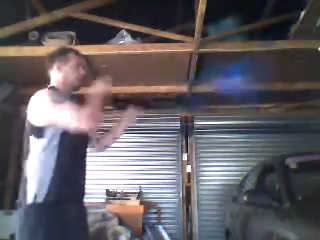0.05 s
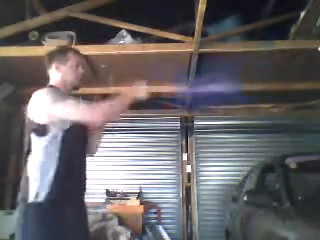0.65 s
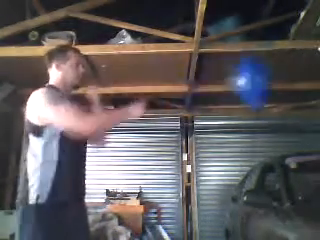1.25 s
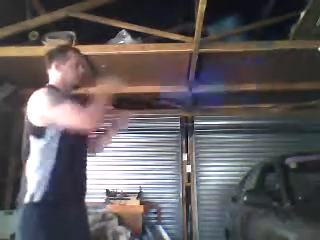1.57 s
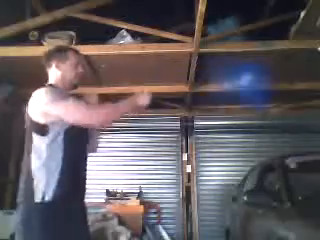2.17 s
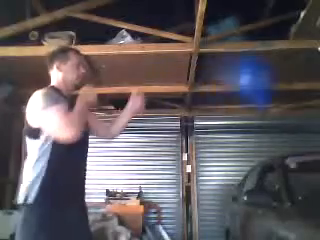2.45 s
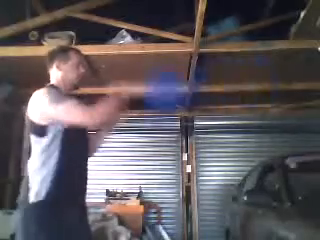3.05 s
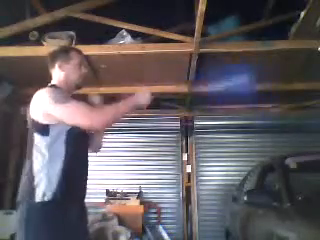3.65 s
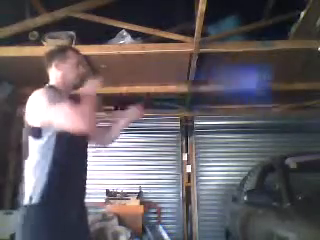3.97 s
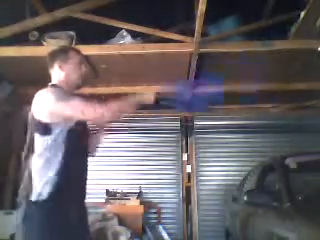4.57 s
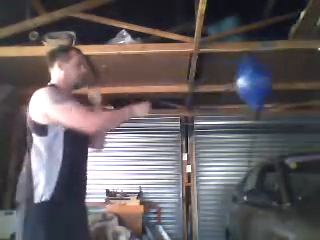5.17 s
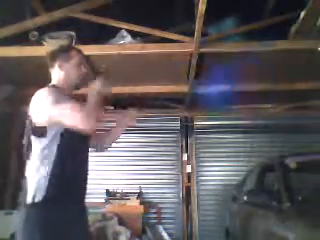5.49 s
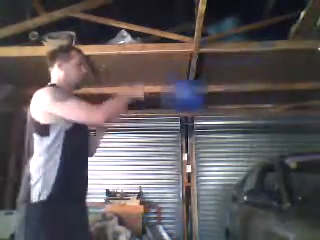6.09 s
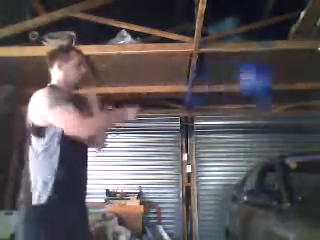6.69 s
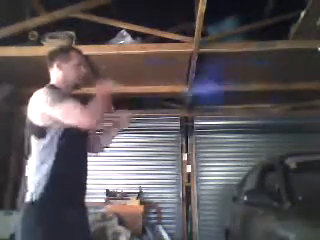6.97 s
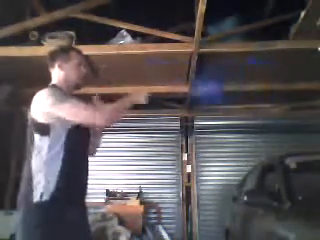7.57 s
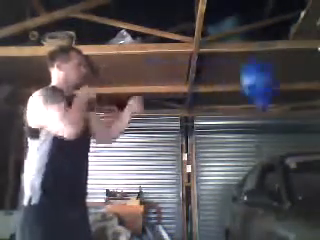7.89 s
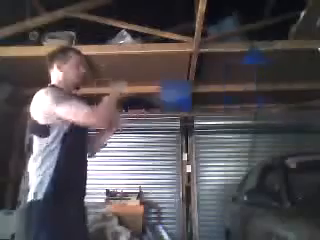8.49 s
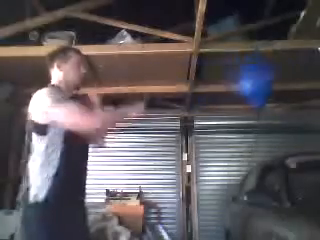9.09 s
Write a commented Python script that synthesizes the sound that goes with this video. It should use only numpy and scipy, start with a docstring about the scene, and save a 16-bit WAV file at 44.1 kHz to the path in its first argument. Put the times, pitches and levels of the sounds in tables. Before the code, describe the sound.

In a garage, a fast, regular run of punches lands on a ball strung on elastic cords. Every blow gives a crisp smack and a hollow thud, varying slightly in strength and tone, and the walls throw it back briefly. Light cord ticks and, later, a few small steel hook clinks fall between the hits. The pace never breaks, and a low, even background noise lies underneath, heard through a small microphone.

```python
"""Punching a focus ball in a garage

Fists strike a ball on tight elastic cords four times a second. Each impact is a slap of skin on the
cover and a hollow thump from the ball's damped modes. Walls, rafters and steel door return it as
early reflections, standing waves and reverberation. Between punches the cords tick and their metal
hooks clink, over a low, steady noise."""
import sys
import numpy as np
from scipy import signal
from scipy.fft import rfft, irfft
from scipy.io import wavfile
from scipy.ndimage import uniform_filter1d

SR = 44100
rng = np.random.default_rng(int(sys.argv[2]) if len(sys.argv) > 2 else 0)


def put_to_file(sound):
    """Save the sound as 16-bit audio at rate SR, in the file named by the first command-line argument."""
    columns = np.atleast_2d(sound).T  # one column per channel
    safe = np.clip(columns, -1, 1)
    whole_steps = np.round(safe * 32767)
    wavfile.write(sys.argv[1], SR, whole_steps.astype(np.int16))


N = 411894
SIZE = 32768  # samples in which one event is built
AGE, HZ = np.arange(SIZE) / SR, np.fft.rfftfreq(SIZE, 1 / SR)

# Background noise: f/Hz, relative spectral density/dB
NOISE_SPECTRUM = [(25, 10), (60, 12.5), (100, -33), (165, 1.5), (230, -6.5), (400, 4.5), (900, -3.5),
                  (2000, -6.5), (4000, -14), (7000, -17.5), (10500, -16), (12200, -27), (13700, -60)]
# Reflections from the nearest surfaces: delay/ms, signed gain
REFLECTIONS = [(3.26, 1.05), (9.3, .42), (10.19, -.28), (11.2, .47), (16.74, .27), (22.13, .3),
               (22.89, -.15), (27.51, .2), (36.3, .3), (41.16, -.22), (47.23, .16), (56.43, .17)]
# Standing waves of the garage: f/Hz, level/dB, T60/s
ROOM_MODES = [(153.9, -33, 0.34), (235.4, -35.5, 0.6)]
# Colour of the reverberation: f/Hz, level/dB
REVERB_SPECTRUM = [(100, -4.5), (160, 10), (220, -4.5), (350, 4), (550, 11.5), (1200, 4), (2700, 7.5),
                   (5000, 5), (10000, -1)]
# Reverberation time: f/Hz, T60/s
REVERB_TIME = [(150, 0.47), (500, 0.34), (2000, 0.34), (5000, 0.39), (11000, 0.3)]
# Clearest ticks of the cords and brushes on the cover: t/s, relative level/dB
CORD_TICKS = [(0.505, -31), (1.24, -36), (1.448, -31), (1.544, -30), (2.911, -26), (3.201, -29),
              (3.292, -23), (3.524, -32.5), (4.013, -21), (4.389, -22.5), (4.577, -14.5), (5.307, -19),
              (6.097, -36), (6.212, -25.5), (6.454, -35), (6.786, -22), (7.037, -27), (7.441, -22.5),
              (7.909, -32), (7.937, -25), (8.016, -22), (8.505, -15)]
# Colour of a tick: f/Hz, level/dB
TICK_SPECTRUM = [(100, -34), (500, -10.5), (1500, 0.5), (3000, -5.5), (6000, -8.5), (9500, 2.5),
                 (11800, -9), (13700, -53)]
# Clinks of the hooks: t/s, relative level/dB
HOOK_CLINKS = [(4.0756, -17.5), (4.5605, -20), (4.8643, -23), (5.3457, -21), (5.5404, -20.5), (6.056, -24),
               (8.7545, -16.5)]
# Modes of a steel hook: f/Hz, relative level/dB, T60/s
HOOK_MODES = [(3140, -20, .02), (3580, 0, 0.034), (4570, -1, 0.017), (5020, 6, 0.025), (6000, -3, 0.014),
              (7700, 5, 0.011), (10300, 0, .006)]
# Hollow thump of the ball: f/Hz, signed initial amplitude, T60/s
BALL_MODES = [(216.4, -.152, .128), (330, .24, .0165)]
# Brief ringing of air and cover: f/Hz, level/dB, T60/s
COVER_MODES = [(615, -46, 0.075), (760, -44, 0.084), (960, -40, 0.053), (1089, -33, 0.053),
               (1407, -29, 0.037), (1994, -35, 0.027)]
# Slap of skin on the cover: f/Hz, level/dB
SLAP_SPECTRUM = [(60, -13.5), (200, 3), (450, 10), (850, 15), (1200, 10), (1450, 15.5), (1950, 11.5),
                 (2600, 5.5), (3400, 6), (6000, 5.5), (9200, 10), (10800, 6.5), (12200, -9.5), (13700, -41)]
# Punches, with levels relative to a usual one:
# t/s, thump/dB, slap/dB, knuckle snap/dB, squareness of contact/dB, air pop f/Hz, air pop/dB
BLOWS = [(0.0845, 1, 0.0, 3.0, 8.0, 1970, 4.5), (0.333, -5.0, -4.5, 2.0, -8.5, 3040, 6.0),
         (0.5765, 0.0, 2.0, -1.5, 6.5, 1020, 1.5), (0.8263, -5, -2.5, -4.5, -3, 4090, 3),
         (1.075, -2, 1.5, -1, 5.0, 1560, 0.5), (1.32, 2.5, -0.5, 0, 4.5, 1950, 7.5),
         (1.567, 2.5, 3.5, -2.5, 3, 2720, 5.5), (1.819, -1.5, -3.5, 0.5, -0.5, 4090, 6.5),
         (2.0655, 3.5, 3.5, -2.0, -5, 2250, 5), (2.3092, -0.5, -3, 2.5, -8, 770, 5.5),
         (2.5542, 1.5, 1.0, 2.5, 3, 2270, 7), (2.807, 3.0, 0.0, -3.5, -1, 1990, 6.0),
         (3.057, -0.5, 0, 0.5, 8.5, 1210, 8), (3.2992, -4, -4, 5.5, -0.5, 1240, 7.5),
         (3.5414, -2.5, -1, 4.5, 14, 1800, 5), (3.7805, -0.5, -3.0, 1, -3, 965, 5),
         (4.0223, -4, 1.0, -0.5, 2.0, 850, 0), (4.2653, 1, -2, 3, 7, 1620, 3.5),
         (4.5157, -1.5, 3, -8.0, -6, 2800, 4), (4.7649, -1.5, -2.5, 4.0, 7.5, 1520, 3.5),
         (5.0085, 3, 2, 5, 2.0, 600, 1.5), (5.2481, -0.5, 0, -4.0, -6, 4200, 3.5),
         (5.4908, 2, -1, -2.5, 2, 3670, 6), (5.7437, 2, -1, 3, 8, 880, 5.5),
         (5.9853, -4.0, -2, 7.5, 2.5, 1500, 1), (6.2291, 1.5, 0.5, -5.5, -3, 1730, 7),
         (6.4757, -1.5, -0.5, 1.0, 2, 3290, 6), (6.7231, 2, 1.5, -3.5, -0.5, 2010, 7),
         (6.974, -5.5, -3, 0.5, 5, 760, -1), (7.2155, 4.0, -1.5, 4.5, -1, 1410, 4.5),
         (7.463, -1.0, 0.5, -2.5, 1, 4470, 7.5), (7.7101, 3.5, -4, 5, 3.0, 2010, 4.5),
         (7.9499, -4.5, -3.5, 9.0, 10, 2640, 3), (8.1953, 2.5, -2, 0, 6, 645, 4),
         (8.4393, 1.5, -0.5, -0.5, 2, 3200, 5), (8.6898, 3.5, -2.5, 5, -2.5, 640, 6.5),
         (8.9309, 2, -1, 6.5, 0, 1390, 4.5), (9.1774, 3.5, 2.5, -6, -3, 900, 3)]


def amp(db):
    """Amplitude ratio for a level in decibels."""
    return 10 ** (np.asarray(db) / 20)


def unit_energy(x):
    """Normalisation to an energy of 1."""
    return x / np.sqrt(np.sum(x ** 2) + 1e-20)


def curve(points, hz=HZ):
    """Linear interpolation on a logarithmic frequency axis."""
    f, value = np.transpose(points)
    return np.interp(np.log(hz + 1), np.log(f + 1), value)


def add_event(mix, start_s, spectrum):
    """Superposition: the first 0.5 s of the sound with this spectrum joins the mix."""
    sound = irfft(spectrum)[:SR // 2]
    part = mix[max(round(start_s * SR), 0):][:len(sound)]
    part += sound[:len(part)]


def pulse(db):
    """Minimum phase: spectrum of the most compact causal pulse with these levels."""
    cepstrum = irfft(np.log(amp(db)))
    cepstrum[1:SIZE // 2] *= 2
    cepstrum[SIZE // 2 + 1:] = 0
    return np.exp(rfft(cepstrum))


def decay(t60, t=AGE):
    """Exponential damping by 60 dB in t60 seconds."""
    return np.exp(-np.log(1000) * t / t60)


def whiten(spectrum, bins):
    """Spectral whitening: division by the local RMS evens out the bands."""
    return spectrum / np.sqrt(uniform_filter1d(abs(spectrum) ** 2, size=bins) + 1e-12)


def ring(modes, detune=0):
    """Free vibration: spectrum of damped modes, each mistuned at random by up to the share detune."""
    shifts = 1 + detune * (2 * rng.random(len(modes)) - 1)
    return rfft(sum(amp(db) * decay(t60) * np.sin(2 * np.pi * hz * shift * AGE)
                    for (hz, db, t60), shift in zip(modes, shifts)))


def contact_noise(t60, rise_s):
    """Many tiny contacts add incoherently: the flat spectrum of a short noise burst."""
    burst = rng.standard_normal(SIZE) * decay(t60) * (1 - np.exp(-AGE / rise_s))
    return whiten(rfft(burst), bins=500)


def background(rms_db=-44.5):
    """Stationary coloured noise: the low, even sound of the garage."""
    colour = amp(curve(NOISE_SPECTRUM, np.fft.rfftfreq(N, 1 / SR)))
    noise = irfft(rfft(rng.standard_normal(N)) * colour, N)
    return amp(rms_db) * np.sqrt(N) * unit_energy(noise)


def reverberation(onset_s=0.0033, build_s=0.0028):
    """Diffuse field: spectrum of dense random reflections, each band decaying at its own rate."""
    arrivals = rng.standard_normal(SIZE) * (rng.random(SIZE) < 0.2)
    hz, t, bands = signal.stft(arrivals, SR, nperseg=256)
    bands = bands * decay(curve(REVERB_TIME, hz)[:, None], t)
    tail = signal.istft(bands, SR, nperseg=256)[1][:SIZE]
    build_up = 1 - np.exp(-np.maximum(AGE - onset_s, 0) / build_s)
    return whiten(rfft(tail * build_up), bins=120) * amp(curve(REVERB_SPECTRUM))


def garage(dull_hz=4000, treble_share=0.27, coherent_hz=900):
    """Multipath propagation: transfer functions of the near paths and of twelve reverberant tails."""
    near = 1  # the direct path
    for ms, gain in REFLECTIONS:
        edge_hz = dull_hz * (REFLECTIONS[0][0] / ms) ** 0.59  # clutter dulls longer paths more
        kept = treble_share + (1 - treble_share) / (1 + (HZ / edge_hz) ** 4)
        near = near + gain * kept * np.exp(-2j * np.pi * HZ * ms / 1000)
    # As the ball moves, the treble paths change while part of the bass stays the same.
    shared = 0.41 / np.sqrt(1 + (HZ / coherent_hz) ** 2)
    common_tail = reverberation()
    return near, [shared * common_tail + np.sqrt(1 - shared ** 2) * reverberation() for _ in range(12)]


def faint_ticks(share=0.43, level_db=-38.5, spread_db=5, return_after_s=0.1, return_lasts_s=0.13):
    """Random ticks on some of the ball's return flights: rows of t/s, relative level/dB."""
    draws = rng.random((len(BLOWS), 3))
    return [(blow[0] + return_after_s + when * return_lasts_s, level_db + spread_db * (size - 0.5))
            for blow, (chance, when, size) in zip(BLOWS, draws) if chance < share]


def cords(near, tails, gain_db=19, wet=0.75):
    """Impulsive excitation: cords snap taut and the swinging ball brushes a fist."""
    out, tick = np.zeros(N), pulse(curve(TICK_SPECTRUM))
    for k, (start_s, db) in enumerate(CORD_TICKS + faint_ticks()):
        paths = contact_noise(t60=0.006, rise_s=0.00029) * near + wet * tails[k % len(tails)]
        add_event(out, start_s, amp(db + gain_db) * tick * paths)
    return out


def hooks(near, tails, gain_db=7.5, wet=0.7, bounce_s=0.03, bounce_db=-6):
    """Inelastic collisions: steel hooks bounce ever weaker in their eyes, damped by the tight cord."""
    out = np.zeros(N)
    click = 1.37 * unit_energy(irfft(pulse(curve(TICK_SPECTRUM))))
    for k, (start_s, db) in enumerate(HOOK_CLINKS):
        for bounce in range(3):
            metal = unit_energy(irfft(ring(HOOK_MODES, detune=0.038)))
            clink = amp(db + gain_db + bounce * bounce_db) * rfft(metal + click)
            early = contact_noise(t60=0.022, rise_s=0.00041) * near
            add_event(out, start_s, clink * (early + wet * tails[(k + bounce) % len(tails)]))
            start_s += bounce_s * (0.5 + rng.random())
    return out


def fist(slap_db, snap_db, square_db, pop_hz, pop_db, snap_hz=3460, crack_hz=8100, pop_width=0.21):
    """Contact shapes the spectrum: knuckles snap, a square hit cracks, air under the fingers pops."""
    snap = snap_db / (1 + (snap_hz / (HZ + 1)) ** 3)
    crack = 0.16 * square_db / (1 + (crack_hz / (HZ + 1)) ** 4)
    pop = pop_db / (1 + ((HZ / pop_hz - 1) / pop_width) ** 2)
    return pulse(slap_db + snap + crack + pop)


def punches(near, tails, crumple_hz=2400, focus=0.58, drag=0.36, skin_db=-1.53, crush_db=-4, room_db=-1):
    """Impact and directivity: a square blow sends its crack ahead, a glancing one into the room."""
    out = np.zeros(N)
    skin = amp(skin_db) * pulse(curve(SLAP_SPECTRUM))
    thump = rfft(sum(swing * decay(t60) * np.cos(2 * np.pi * hz * AGE) for hz, swing, t60 in BALL_MODES))
    standing_waves = ring(ROOM_MODES)
    bass = 1 / (1 + (HZ / crumple_hz) ** 4)
    treble = 1 - bass
    for k, (start_s, thump_db, slap_db, snap_db, square_db, pop_hz, pop_db) in enumerate(BLOWS):
        colour = fist(slap_db, snap_db, square_db, pop_hz, pop_db)
        body = amp(thump_db) * thump + colour * ring(COVER_MODES, detune=0.042)
        slap = colour * skin
        ahead = 2 / (1 + amp(-2 * focus * square_db * treble))  # forward power, 1 for a usual blow
        # A glancing fist drags longer; a square one puts more energy into a single spike.
        crackle = contact_noise(t60=0.013 * amp(-drag * square_db), rise_s=0.00026)
        spike_share = 0.24 * (ahead / 2) ** 2
        crack = np.sqrt(spike_share) + np.sqrt(1 - spike_share) * crackle
        contact = np.sqrt(bass) + np.sqrt(treble * ahead) * crack
        crush = amp(crush_db) * bass * contact_noise(t60=0.012, rise_s=0.0041)  # the cover caves in
        early = (body + slap * contact) * near + slap * crush
        diffuse = amp(room_db) * (body + slap * np.sqrt(2 - ahead)) * tails[k % len(tails)]
        add_event(out, start_s, early + amp(thump_db) * standing_waves + diffuse)
    return out


def scene():
    """Superposition in one room: ball, cords, hooks and background add as pressures."""
    room = garage()
    return (punches(*room) + cords(*room) + hooks(*room) + background())[None]


def record(dry, low_cut_hz=132, clip_level=0.85, high_cut_hz=13200):
    """A small microphone as a transducer: bass roll-off, clipping of peaks, then a band limit."""
    thin = signal.sosfilt(signal.butter(3, low_cut_hz, "highpass", fs=SR, output="sos"), dry)
    clipped = np.clip(thin, -clip_level, clip_level)
    band_limit = signal.firwin(151, high_cut_hz, window=("kaiser", 9), fs=SR)
    return signal.oaconvolve(clipped, band_limit[None], "same")


dry = scene()
out = record(dry)
put_to_file(out)
```